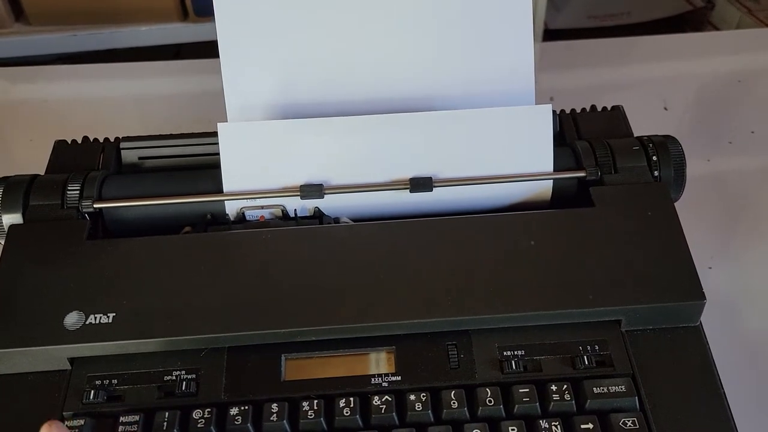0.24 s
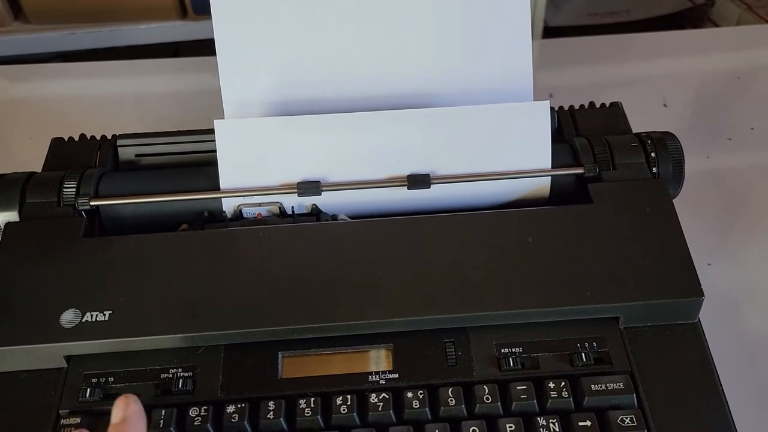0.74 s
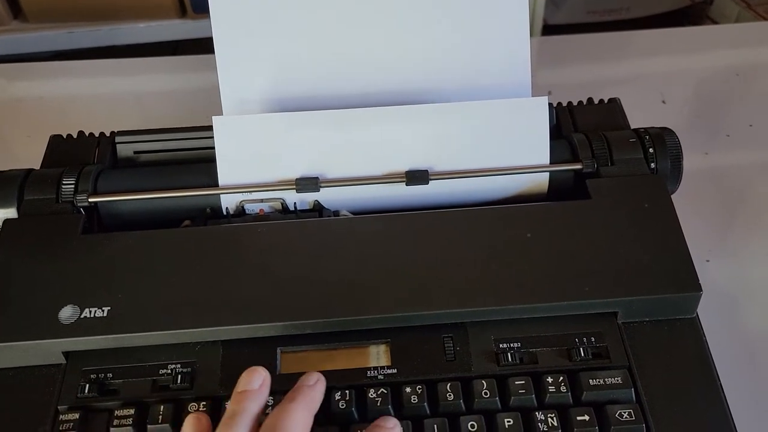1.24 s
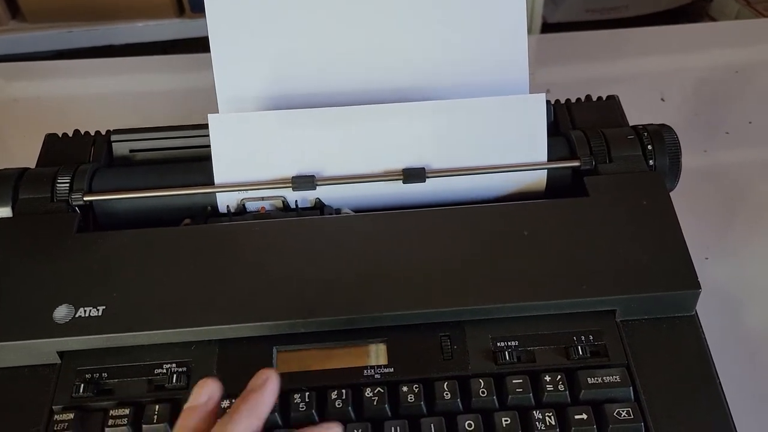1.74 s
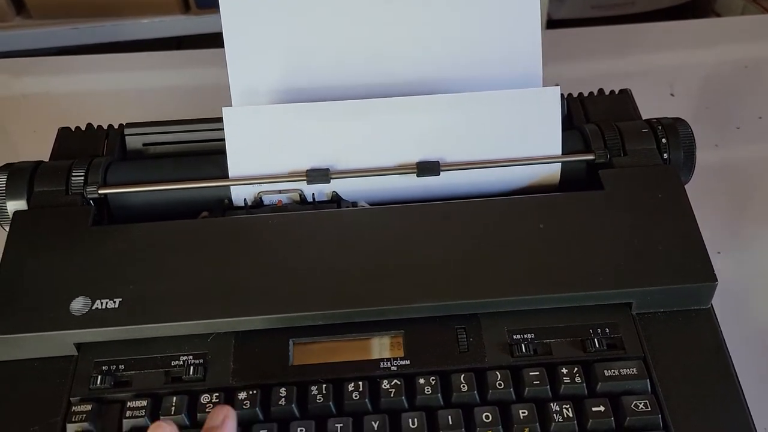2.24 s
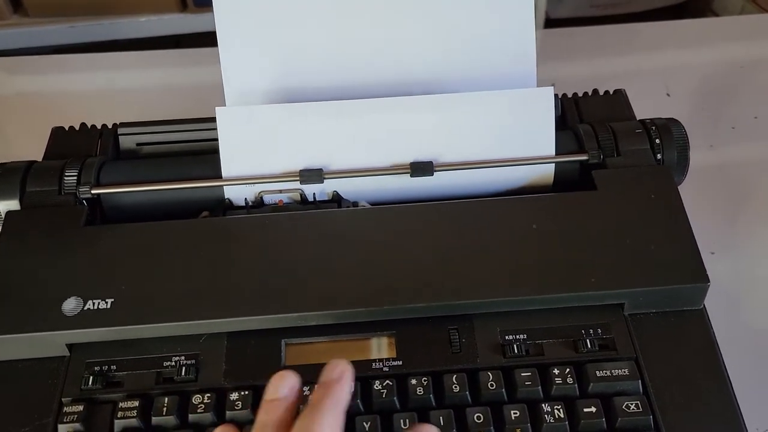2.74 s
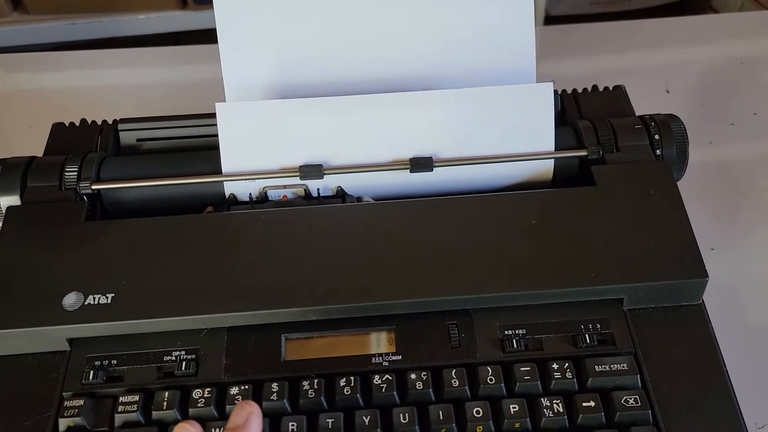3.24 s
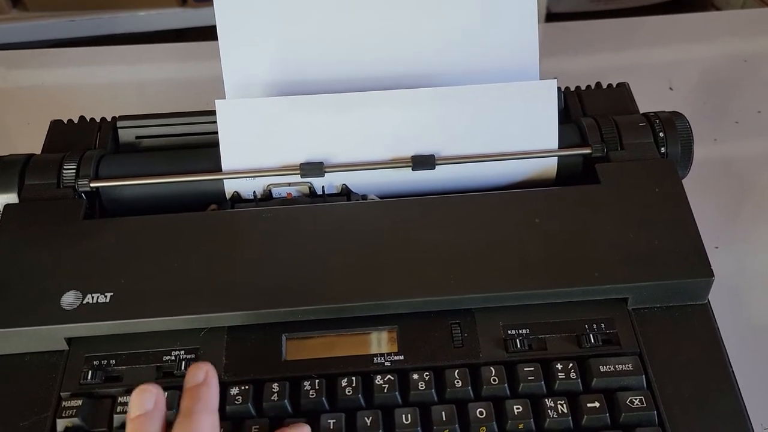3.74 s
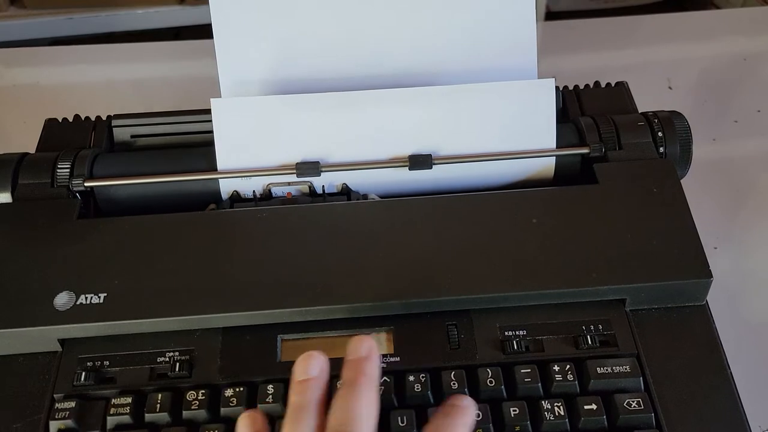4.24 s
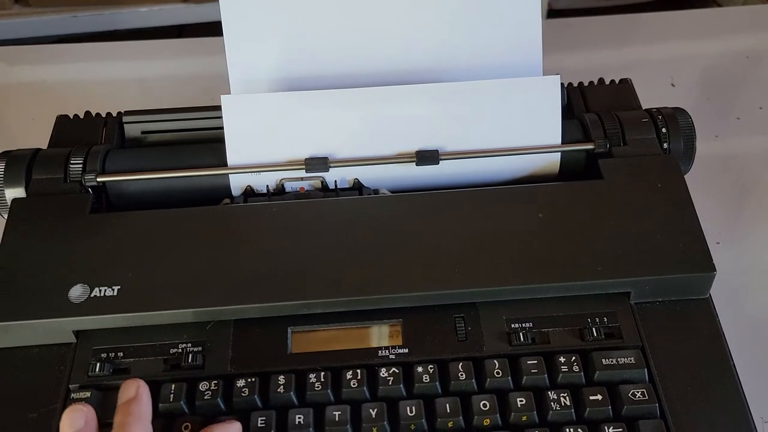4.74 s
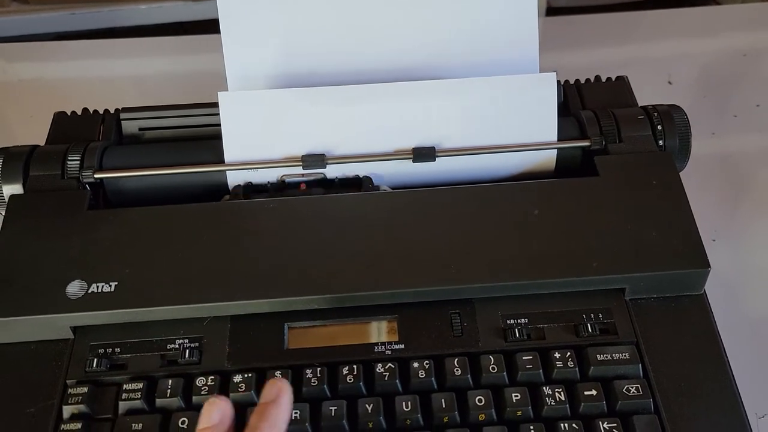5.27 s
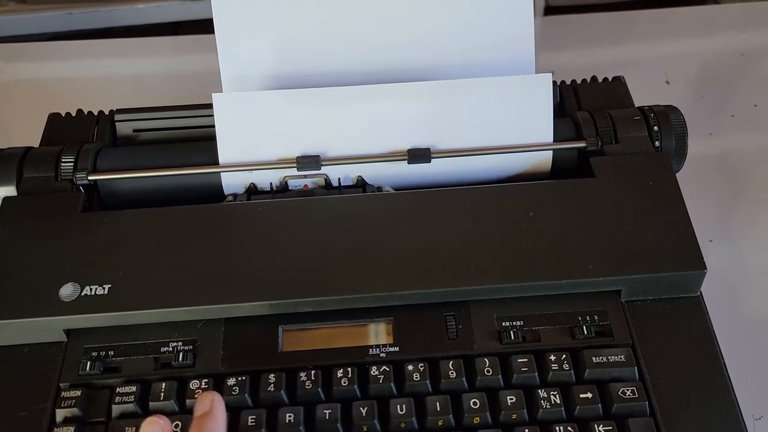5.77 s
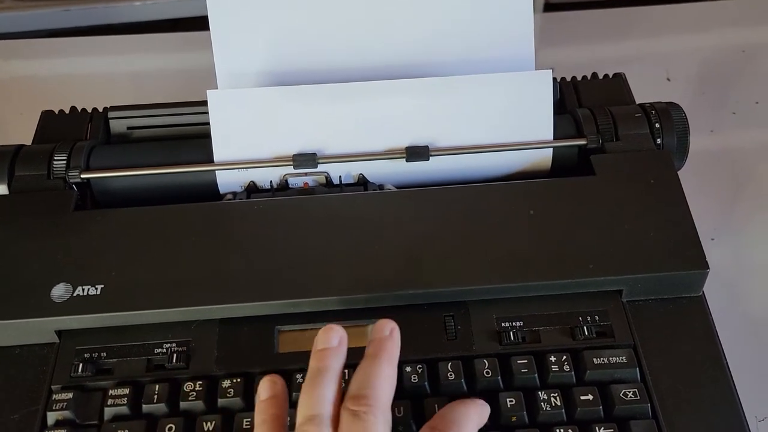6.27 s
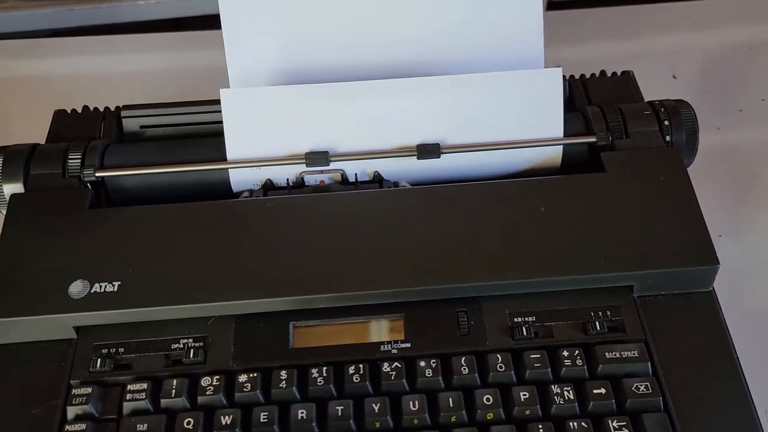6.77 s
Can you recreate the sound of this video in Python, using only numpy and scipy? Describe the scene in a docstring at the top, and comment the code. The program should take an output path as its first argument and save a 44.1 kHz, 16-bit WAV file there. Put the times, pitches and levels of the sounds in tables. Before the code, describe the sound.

Someone slowly pecks at an electric typewriter, each key click followed by a brief motor whir, a sharp hammer snap and a carriage rattle.

```python
"""Small room, close microphone: an electric print-wheel typewriter is pecked at slowly.
Keys click, a geared motor whirs the wheel round, the ribbon lifts, the hammer snaps, the carriage rattles a step on.
The space bar steps the carriage and clatters; the machine hums, and faint whistles come from far off.
Contacts are shaped noise bursts and rung modes, the motor is gear noise plus a gliding whine, the room a noise tail."""
import sys
import numpy as np
from scipy import signal
from scipy.fft import rfft, irfft
from scipy.io import wavfile
from scipy.ndimage import uniform_filter1d

SR = 44100
rng = np.random.default_rng(int(sys.argv[2]) if len(sys.argv) > 2 else 0)


def bounce(signal):
    """Save signal as a 16-bit WAV file at the path given by the first command-line argument."""
    frames = np.transpose(np.atleast_2d(signal))
    limited = np.clip(frames, -1, 1)
    pcm = np.round(limited * 32767).astype(np.int16)
    wavfile.write(sys.argv[1], SR, pcm)


N = 309141
T = np.arange(N) / SR


def amp(db):
    """Decibels to amplitude ratio."""
    return 10 ** (np.asarray(db) / 20)


def unit(x):
    """Scale to an RMS of 1."""
    return x / np.sqrt(np.mean(x ** 2) + 1e-20)


def read(points, hz):
    """Interpolate a (Hz, value) curve over log frequency."""
    f, value = np.transpose(points)
    return np.interp(np.log(hz + 1), np.log(f + 1), value)


def add(mix, start_s, sound):
    """Mix a sound in at its start time, cut at the end of the mix."""
    part = mix[..., max(round(start_s * SR), 0):][..., :sound.shape[-1]]
    part += sound[..., :part.shape[-1]]


def convolve(x, response):
    """Convolve each port, cut to N samples."""
    return signal.oaconvolve(np.atleast_2d(x), np.atleast_2d(response), axes=1)[:, :N]


def colour(x, spectrum, size=2048):
    """Causal minimum-phase filter with this spectrum that keeps the power of white noise."""
    log_gain = np.log(amp(read(spectrum, abs(np.fft.fftfreq(size, 1 / SR)))))
    min_phase = np.exp(np.conj(signal.hilbert(log_gain)))
    response = np.fft.ifft(min_phase).real[:size // 2]
    return convolve(x, response / np.linalg.norm(response))


# Likeness of the two microphone ports. Each row: frequency in Hz, likeness 0-1.
LIKENESS = [(60, 0.91), (300, 0.6), (700, 0.29), (1400, 0.01), (2800, 0.73), (6000, 0), (15000, 0.08)]


def ports(x, lead_ms=.12, size=512):
    """Two unrelated signals become a microphone pair; sound reaches the left port lead_ms first."""
    hz, _, (left, other) = signal.stft(x, SR, nperseg=size)
    same = np.clip(read(LIKENESS, hz), 0, 1)[:, None]
    delay = np.exp(-2j * np.pi * hz * lead_ms / 10 ** 3)[:, None]
    right = (same * left + np.sqrt(1 - same ** 2) * other) * delay
    return signal.istft(np.array([left, right]), SR, nperseg=size)[1][:, :N]


def smooth_noise(count, size):
    """White noise averaged over size samples, RMS 1."""
    return unit(uniform_filter1d(rng.standard_normal(count), size))


def grit(spread_db, size=40):
    """Noise of tiny contacts of uneven force, each about size samples long."""
    force = amp(spread_db * smooth_noise(N, size))
    return unit(force * rng.standard_normal((2, N)))


def blows(times_s, levels_db, rise_s, fall_s):
    """Envelope of blows that swell quickly and die away."""
    t, out = T[:SR // 2], np.zeros(N)
    shape = (1 - np.exp(-t / rise_s)) * np.exp(-t / fall_s)
    for s, db in np.broadcast(times_s, levels_db):
        add(out, s, amp(db) * shape / shape.max())
    return out


def ring(x, modes):
    """Blows ring a set of exponentially decaying modes."""
    t = T[:SR // 2]
    response = sum(amp(db - 60 * t / t60_s) * np.sin(2 * np.pi * hz * t) for hz, db, t60_s in modes)
    return convolve(x, response)


def snap(fall_s, size=512, count=5):
    """Hard contact scattered in the case: a brief burst, even spectrum, energy 1 per port."""
    shape = np.exp(-T[:size] / fall_s)
    burst = rng.standard_normal((2, size)) * shape
    for _ in range(count):  # alternately flatten the spectrum and shorten the burst
        z = rfft(burst)
        burst = irfft(z / abs(z)) * np.minimum(1, 4 * shape)
    return burst / np.linalg.norm(burst, axis=1, keepdims=True)


def housing(x, ring_db=-2, t60_s=0.034, size=4096):
    """The plastic shell adds dense, short-lived resonances to whatever moves inside."""
    echoes = rng.standard_normal(size) * amp(-60 * T[:size] / t60_s)
    shell = convolve(x, echoes / np.linalg.norm(echoes))
    return (x + amp(ring_db) * shell) / np.hypot(1, amp(ring_db))


# Room air noise spectrum. Each row: frequency in Hz, gain in dB.
AIR_COLOUR = [(25, -14), (45, 0), (85, -1), (130, -9), (220, -16), (400, -23), (750, -23), (1400, -23),
              (2200, -34), (4000, -42), (7000, -52), (10000, -55), (15500, -48)]


def hum(hum_db=-59, air_db=-62, drone_db=-66):
    """Mains hum of the machine over a low wavering drone and the hiss of the room."""
    mains = np.sin(2 * np.pi * 59.4 * T) + amp(-15) * np.sin(2 * np.pi * 118.8 * T)
    drone_colour = [(20, -24), (48, -8.5), (68, -7), (85, 0.0), (105, -8), (200, -30.0),
                    (600, -54.5), (2000, -78.5)]  # Hz, dB
    drone = colour(rng.standard_normal((2, N)), drone_colour, size=8192)
    air = colour(rng.standard_normal((2, N)), AIR_COLOUR)
    return amp(hum_db) * mains + ports(amp(air_db) * air + amp(drone_db) * drone, lead_ms=0)


# A harder finger gets the key down sooner.
TRAVEL_S, USUAL_FORCE_DB, TRIP_DB = .007, -23, -11.5


def bottomed(presses):
    """When each key bottoms, in s: travel time is inverse to the finger's force."""
    touched_s, force_db, *_ = np.transpose(presses)
    return touched_s + TRAVEL_S * amp(USUAL_FORCE_DB - force_db)


# Spaces. Each row: bar touched in s, finger force in dB, bar let go in s, bar hits its stop in s, clatter in dB.
SPACES = [(0.0088, -15, 0.068, 0.1065, -19.5), (2.998, -18, 3.1108, 3.159, -26.5),
          (5.434, -18.5, 6.5, 5.579, -24.5)]
# Letters. Each row: key touched in s, finger force in dB, bright tick of that key in dB, hammer blow in s,
# relative jolt of the case in dB, relative motor whine in dB.
LETTERS = [(0.8196, -25, -7, 0.988, -4, -38), (1.334, -31, 9, 1.5216, 4.5, -45.5),
           (1.609, -25, -1, 1.7662, 7.5, -46.5), (2.1701, -22.5, 6, 2.3134, 4, -45.5),
           (2.6102, -23.5, -11.5, 2.7368, 0.5, -36), (3.3441, -20, 11.5, 3.4896, 2, -39.5),
           (3.7054, -20.5, 10.5, 3.8395, 1, -43), (4.1268, -34, -7.5, 4.2982, 3, -46),
           (4.6942, -30, 12, 4.82, -1, -42.5), (5.1564, -27, 14, 5.3084, 3, -49),
           (5.791, -22.5, 8, 5.961, -4, -38), (6.267, -27, 5, 6.421, 2, -48),
           (6.8493, -31, 1.5, 7.15, 0, -38)]
# A finger brushes a key or lets it snap back up. Each row: start in s, level in dB.
KEY_SNAPS = [(1.4603, -26), (1.641, -17), (2.974, -38.5), (4.2451, -18), (5.257, -14.5), (6.352, -19)]


def key_contacts(trip_knock_db=-10, bottom_db=-13, bottom_knock_db=15, bottom_tick_db=-13,
                 bar_tick_db=6, bar_bottom_db=-13, bar_knock_db=0, let_go_db=-33,
                 flick_knock_db=-14, flick_tick_db=-4):
    """Finger contacts as (s, level dB, dull knock dB, bright tick dB): a key trips, then knocks as it bottoms."""
    contacts = []
    for (s, force_db, tick_db, *_), down_s in zip(LETTERS, bottomed(LETTERS)):
        contacts.append((s, force_db + TRIP_DB, trip_knock_db, tick_db))
        contacts.append((down_s, force_db + bottom_db, bottom_knock_db, bottom_tick_db))
    for (s, force_db, let_go_s, *_), down_s in zip(SPACES, bottomed(SPACES)):
        contacts.append((s, force_db + TRIP_DB, trip_knock_db, bar_tick_db))
        contacts.append((down_s, force_db + bar_bottom_db, bar_knock_db, bar_tick_db))
        contacts.append((let_go_s, let_go_db, trip_knock_db, bar_tick_db))
    return contacts + [(s, db, flick_knock_db, flick_tick_db) for s, db in KEY_SNAPS]


# Keycap spectrum. Each row: frequency in Hz, gain in dB.
KEYCAP_COLOUR = [(60, -24.5), (200, -25), (400, -9), (800, -3.5), (1200, -1), (1600, -1.5), (2200, 2),
                 (3200, -1), (4500, -10), (6500, -18.5), (8000, -15), (11000, -24.5), (15500, -24)]
# Keycap modes. Each row: frequency in Hz, level in dB, t60 in s.
KEY_MODES = [(907, -8, 0.11), (1400, 2.5, 0.049), (1400, -4.5, 0.06), (2240, -4.5, 0.039),
             (2550, -4.5, 0.035), (3200, -5, 0.037), (8200, -17, .03)]


def keys(click_db=17, loose_db=-11, slide_db=-22, lead_s=0.0083, ring_db=-35):
    """Plastic keys slide, click and chatter briefly; each contact has its own share of knock and tick."""
    drive, t = np.zeros((2, N)), T[:2048] - lead_s
    slide = amp(slide_db) * (1 + t / lead_s)
    chatter = amp(loose_db) * np.exp(-abs(t) / 0.015)
    rub = np.where(t < 0, slide, chatter)
    low_pass = signal.butter(1, 900, fs=SR, output="sos")
    high_pass = signal.butter(1, 7000, "high", fs=SR, output="sos")
    for s, db, knock_db, tick_db in key_contacts():
        click = rub * rng.standard_normal((2, len(t)))
        add(click, lead_s, amp(click_db) * snap(0.0029))
        knock = (amp(knock_db) - 1) * signal.sosfilt(low_pass, click)
        tick = (amp(tick_db) - 1) * signal.sosfilt(high_pass, click)
        add(drive, s - lead_s, amp(db) * (click + knock + tick))
    return colour(drive, KEYCAP_COLOUR) + amp(ring_db) * ring(drive, KEY_MODES)


# Room decay. Each row: frequency in Hz, t60 in s.
ROOM_DECAY = [(100, 0.29), (400, 0.39), (1500, 0.31), (4000, 0.36), (7500, 0.35), (11000, 0.23),
              (16000, 0.21)]


def room(x, size=256):
    """A diffuse tail, different at each port, each band dying at its own speed."""
    hz, t, z = signal.stft(rng.standard_normal((2, SR)), SR, nperseg=size)
    decay = amp(-60 * t / read(ROOM_DECAY, hz)[:, None])
    tail = signal.istft(z * decay, SR, nperseg=size)[1][:, :SR]
    tail = tail * np.clip((T[:SR] - .004) / 0.0027, 0, 1)  # fades in after 4 ms
    return convolve(x, tail / np.linalg.norm(tail[0]))


def strikes():
    """When the hammer prints each letter, in s."""
    return np.array([blow_s for _, _, _, blow_s, _, _ in LETTERS])


# Carriage levels are alike for every step; the lag runs from the space bar bottoming.
CARRIAGE_DB, SPACE_STEP_DB, SPACE_LAG_S = -35, -35, 0.036
# Carriage spectrum. Each row: frequency in Hz, gain in dB.
CARRIAGE_COLOUR = [(60, -14), (230, -10), (340, -1.5), (500, -5), (800, -0.5), (1300, -7), (1900, -1),
                   (2900, -1.5), (3800, -8), (5200, -11), (7000, -13), (10000, -26), (15500, -24)]


def carriage(rattle_db=3, delay_s=0.00095, stop_db=-15, jerk_s=0.029, jerk_depth=0.2):
    """The carriage jerks one letter on, rattles out in a few surges and settles."""
    at, space_at = strikes(), bottomed(SPACES) + SPACE_LAG_S
    shake = blows(at + delay_s, CARRIAGE_DB + rattle_db, 0.003, 0.041)
    shake += blows(at + 0.12, CARRIAGE_DB + stop_db, 0.0054, 0.0093)
    since_blow_s = T - at[np.maximum(np.searchsorted(at, T) - 1, 0)]
    shake *= 1 + jerk_depth * np.cos(2 * np.pi * since_blow_s / jerk_s)
    shake += blows(space_at, SPACE_STEP_DB, .0015, .016)
    shake += blows(space_at + .026, SPACE_STEP_DB - 1, .006, .026)
    contacts = grit(5, size=90)
    return housing(colour(shake * contacts, CARRIAGE_COLOUR), ring_db=-6)


# Modes of the case on the desk. Each row: frequency in Hz, level in dB, t60 in s.
CASE_MODES = [(60, -15.5, 0.17), (89.5, -6, 0.34), (138, -7.5, 0.16), (160, -11.5, .07), (191, -8.5, 0.19),
              (300, -9, 0.05), (331, 0, 0.13), (368, -5.5, 0.18), (390, -13.5, 0.06), (713, -8, 0.08),
              (785, -14.5, 0.1)]


def case(jolt_db=-44, step_db=-52, step_s=0.012, count=6):
    """Hammer blows and the carriage motor's uneven steps thump the case."""
    push = np.zeros(N)
    for *_, s, db, _ in LETTERS:
        add(push, s, amp([db + jolt_db]))
    for s in np.append(strikes() + 0.0071, bottomed(SPACES) + SPACE_LAG_S + 0.017):
        for k, (late, force) in enumerate(rng.standard_normal((count, 2))):
            size_db = step_db + 3 * force
            add(push, s + k * step_s + .0025 * late, amp([size_db]) * (-1) ** k)
    return ring(push, CASE_MODES)


# Space bar spectrum. Each row: frequency in Hz, gain in dB.
BAR_COLOUR = [(60, -22.5), (200, -12.5), (400, -21), (900, -9), (1800, -11), (2700, 3), (3800, -7.5),
              (6000, -12), (9000, -23.5), (12000, -20.5), (15500, -11.5)]
# Modes of the bar's wire. Each row: frequency in Hz, level in dB, t60 in s.
WIRE_MODES = [(2635, 6, .1), (2760, -1, .07), (5250, -22, .45), (5310, -23, .4)]


def space_bar(bounce_db=-3, wire_db=-41):
    """The long bar clatters against its stop, bounces once, and its wire rings."""
    *_, at, level_db = np.transpose(SPACES)
    hits = blows(at, level_db, 0.002, 0.0055) + blows(at + .006, level_db + bounce_db, 0.002, 0.011)
    clatter = hits * grit(0.67)
    return colour(clatter, BAR_COLOUR) + amp(wire_db) * ring(clatter, WIRE_MODES)


# Far whistles. Each row: start in s, length in s, first Hz, last Hz, level sent to the room in dB.
WHISTLES = [(0.339, 0.039, 1975, 2020, -68.5), (0.414, 0.12, 3400, 3250, -85),
            (0.494, 0.047, 3650, 4690, -73.5), (0.53, 0.1, 4510, 4720, -74), (0.492, 0.19, 2985, 2833, -73),
            (6.159, 0.067, 2140, 1970, -60.5), (6.56, 0.2, 4070, 3390, -64.5)]


def whistles():
    """Soft gliding sines of slightly wavering pitch."""
    out = np.zeros(N)
    for s, length_s, first_hz, last_hz, db in WHISTLES:
        n = int(length_s * SR)
        hz = np.linspace(first_hz, last_hz, n) * (1 + 0.0098 * smooth_noise(n, 60))
        add(out, s, amp(db) * signal.windows.tukey(n, .5) * np.sin(2 * np.pi * np.cumsum(hz) / SR))
    return out


MOTOR_LAG_S = .039  # from the key bottoming to the motor starting
# Gear spectrum. Each row: frequency in Hz, gain in dB.
GEARS_COLOUR = [(60, -71), (220, -29.5), (400, -11), (900, -10), (1400, -2.5), (1900, -2.5), (2500, 5),
                (3200, -10.5), (3900, -3), (5000, -7.5), (7000, -8.5), (10000, -19), (15500, -18)]
# Gear whine. Each row: multiple of the tooth rate, level in dB.
WHINE = [(1, -3), (1.5, -9), (2, -1), (3, -12)]


def wheel_motor(gear_db=-38, tooth_hz=1620, spin_up_s=.021, run_on_s=.125, brake_s=0.052, start_db=-35):
    """The motor spins up with a rising whine, runs on to feed the ribbon and brakes; gears buzz in the case."""
    speed, load, clean = np.zeros(N), np.zeros(N), np.zeros(N)
    starts = bottomed(LETTERS) + MOTOR_LAG_S
    for start, (*_, blow_s, _, whine_db) in zip(starts, LETTERS):
        t = np.arange(0, blow_s + run_on_s - start, 1 / SR)
        slowing = np.clip((t[-1] - t) / brake_s, 0, 1)
        add(speed, start, (1 - np.exp(-(t + .005) / spin_up_s)) * slowing ** 0.34)
        add(load, start, np.clip(t / 0.029, 0, 1) * slowing ** 0.38)
        # whine sounds once the teeth mesh, until the ribbon's drag muffles it
        meshed = np.clip((t - .012) / .02, 0, 1)
        muffle = np.interp(start + t, [blow_s - .04, blow_s], [1, .3])
        add(clean, start, amp(whine_db) * meshed * muffle)
    waver = 1 + .022 * smooth_noise(N, 45)
    judder = unit(amp(2.5 * smooth_noise(N, 200)))
    turns = np.cumsum(tooth_hz * speed * waver) / SR
    whine = sum(amp(db) * np.sin(2 * np.pi * k * turns) for k, db in WHINE)
    teeth = unit(grit(2.5) * (1 + .5 * np.cos(2 * np.pi * turns)))
    # gears pass through a resonance of the wheel on the way up to speed
    shiver = blows(starts + 0.014, start_db, .005, 0.026) * grit(2.4)
    shiver = colour(shiver, [(900, -28.0), (2000, -11.5), (2450, 10), (2900, 1), (6000, -30.5)])
    buzz = colour(amp(gear_db) * load * teeth, GEARS_COLOUR)
    return judder * (housing(buzz) + load * clean * whine) + shiver


RIBBON_DB = -20
# Ribbon lift spectrum. Each row: frequency in Hz, gain in dB.
RIBBON_COLOUR = [(60, -42.5), (220, -24), (400, -14), (650, 1), (950, -12), (1300, 2.5), (2000, -2.5),
                 (2800, 1.5), (4000, -6), (7000, -6.5), (10000, -11.5), (15500, -3.5)]


def ribbon(lift_db=-2, second_db=-5):
    """The ribbon lifts with a double clack just ahead of each blow."""
    at = strikes()
    lift = blows(at - .029, RIBBON_DB + lift_db, .0003, .0035)
    lift += blows(at - .0235, RIBBON_DB + second_db, .0005, .005)
    return colour(lift * grit(2.3), RIBBON_COLOUR)


HAMMER_DB = -6  # same force for every letter
# Hammer spectrum. Each row: frequency in Hz, gain in dB.
HAMMER_COLOUR = [(60, -35), (250, -53), (850, -19.5), (1700, -20), (2400, -9), (3100, 1), (3900, -5),
                 (4800, -4.5), (5700, -8), (7500, -10), (10000, -13.5), (13000, -18.5), (15500, -19.5)]
# Modes of hammer and platen. Each row: frequency in Hz, level in dB, t60 in s.
PLATEN_MODES = [(2260, -8.5, .025), (2840, -3, 0.023), (3304, 0.5, 0.058), (3850, -5.5, 0.049),
                (5000, -9, 0.017), (5400, -6, 0.022), (11200, -11, 0.027)]


def hammer(blow_db=16, swing_db=-22, rebound_db=-24, own=.7, platen_db=-37, contact_s=.0021):
    """The hammer slides out, snaps the petal against paper and platen, and falls back on its stop."""
    at = strikes()
    drive, usual = np.zeros((2, N)), snap(contact_s)
    for s in at:  # each blow mixes a shared snap with one of its own
        blow = (usual + own * snap(contact_s)) / np.hypot(1, own)
        add(drive, s, amp(HAMMER_DB + blow_db) * blow)
    shudder = blows(at + .001, HAMMER_DB - 17, .0004, .004)
    rebound = blows(at + 0.026, HAMMER_DB + rebound_db, 0.0008, 0.0036)
    swing = blows(at - .011, HAMMER_DB + swing_db - 0.5, 0.0019, 0.01)
    swing += blows(at - .004, HAMMER_DB + swing_db, 0.00067, 0.0088)
    slide_colour = [(100, -28.5), (1000, -6.5), (2400, -5.5), (3400, -5), (5500, -8),
                    (8000, -21), (15500, -30.0)]  # Hz, dB
    slide = colour(swing * grit(1.1), slide_colour)
    strike = colour(drive + (shudder + rebound) * grit(1.5), HAMMER_COLOUR)
    return strike + amp(platen_db) * ring(drive, PLATEN_MODES) + slide


def scene(room_db=-11.5, thump_room_db=-7, bar_room_db=-17):
    """Hammer a little left; motor and keys louder on the right; space bar driest; whistles only as echo."""
    blow = ports(hammer()) * amp([[0], [-.3]])
    works = ports(ribbon() + wheel_motor() + carriage()) * amp([[-2], [.8]])
    fingers, bar = (ports(x) * amp([[-3], [1]]) for x in (keys(), space_bar()))
    near, thump = blow + works + fingers, case()
    to_room = amp(room_db) * near[0] + amp(bar_room_db) * bar[0] + amp(thump_room_db) * thump
    echo = room(to_room + whistles())
    return near + bar + thump + echo + hum()


EDGE_HZ = 16000


def record(dry):
    """The microphone sheds the deepest bass, full scale clips the sharpest peaks; then the band limit."""
    lean = signal.sosfilt(signal.butter(3, 36, "high", fs=SR, output="sos"), dry)
    band_limit = signal.firwin(255, EDGE_HZ, window=("kaiser", 8), fs=SR)
    return signal.oaconvolve(np.clip(lean, -1, 1), band_limit[None], "same", axes=1)


dry = scene()
out = record(dry)
bounce(out)
```